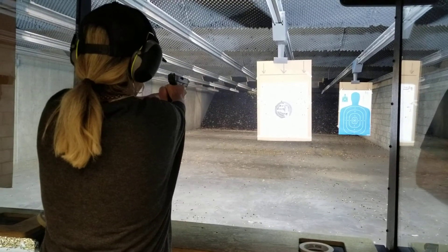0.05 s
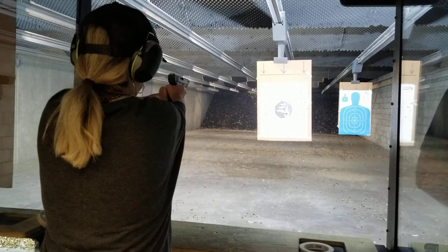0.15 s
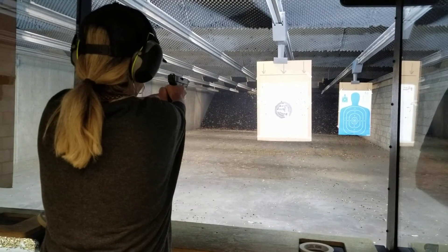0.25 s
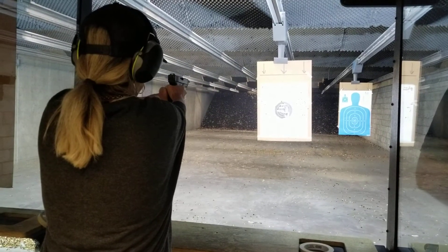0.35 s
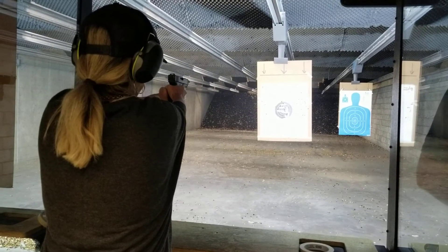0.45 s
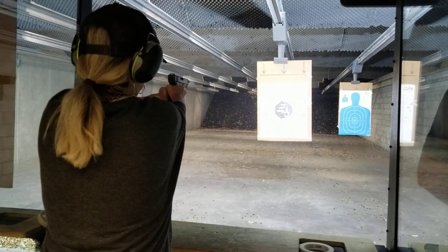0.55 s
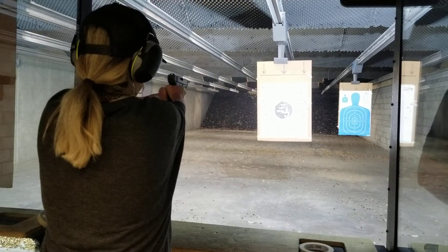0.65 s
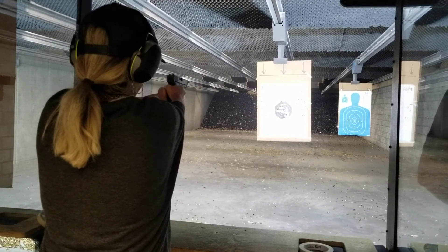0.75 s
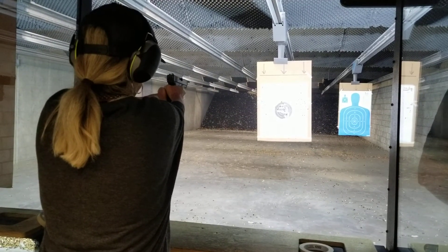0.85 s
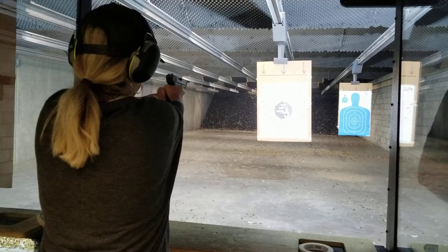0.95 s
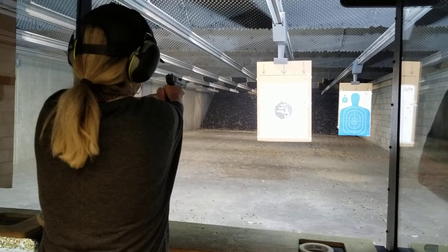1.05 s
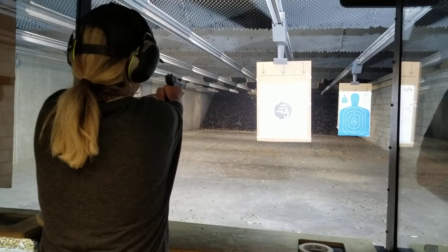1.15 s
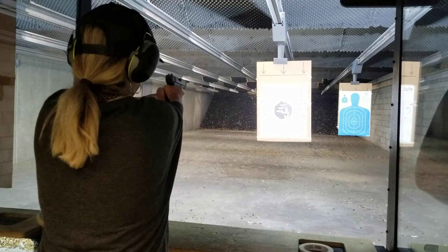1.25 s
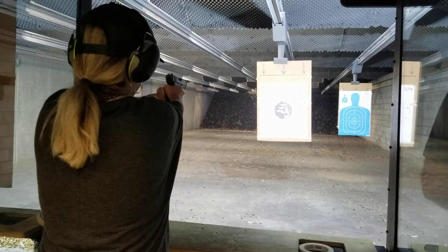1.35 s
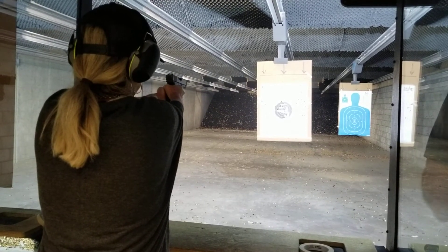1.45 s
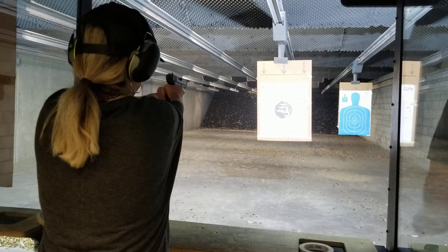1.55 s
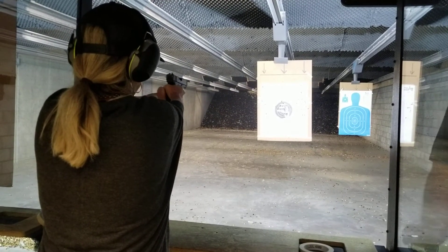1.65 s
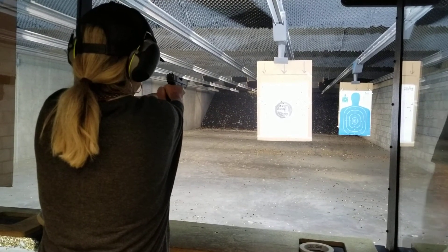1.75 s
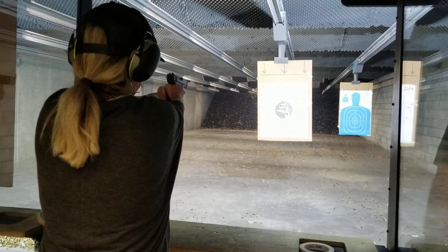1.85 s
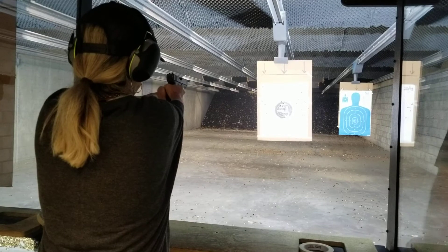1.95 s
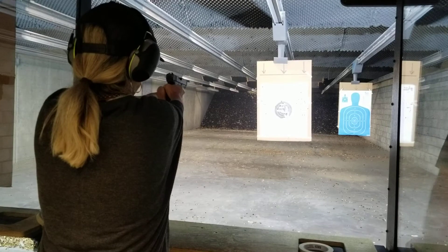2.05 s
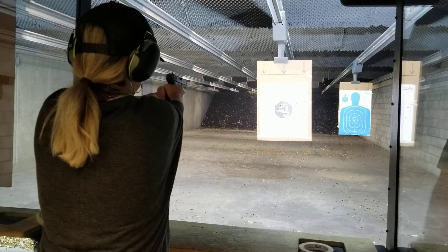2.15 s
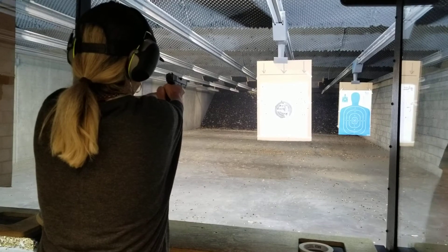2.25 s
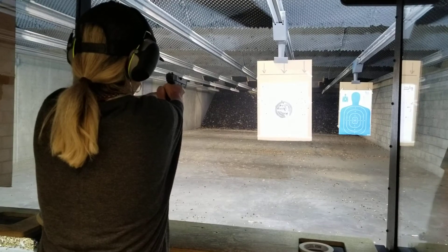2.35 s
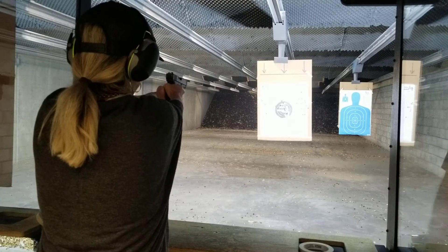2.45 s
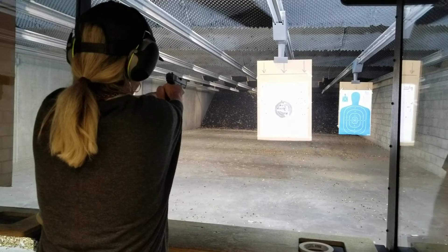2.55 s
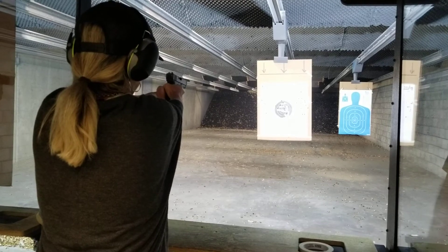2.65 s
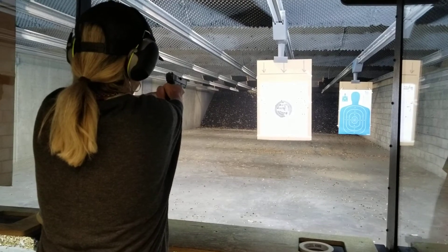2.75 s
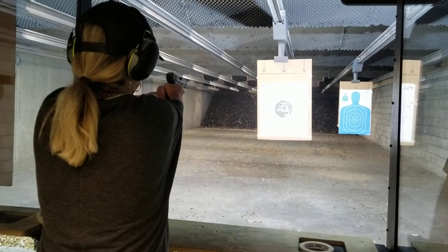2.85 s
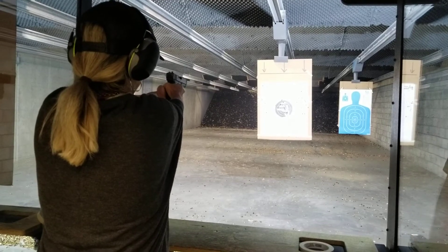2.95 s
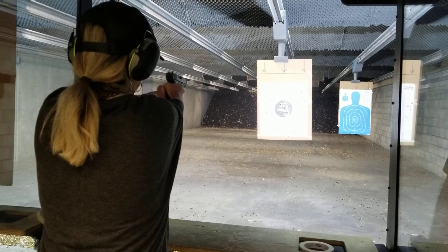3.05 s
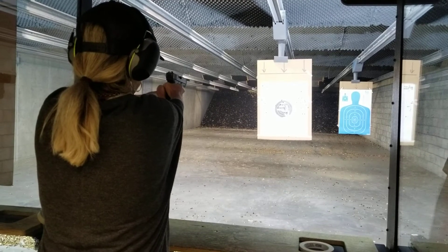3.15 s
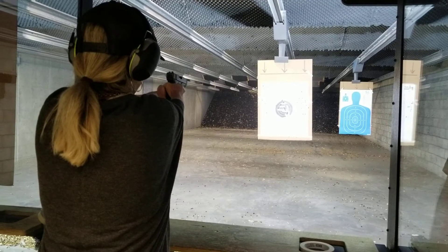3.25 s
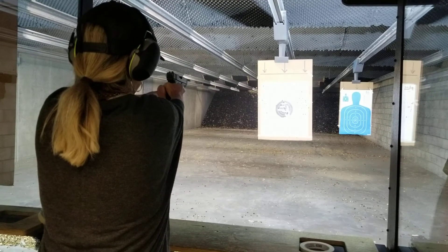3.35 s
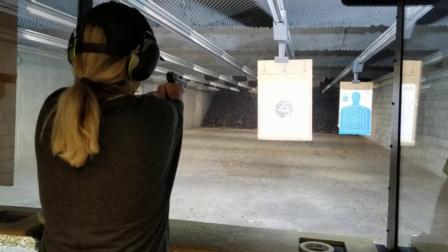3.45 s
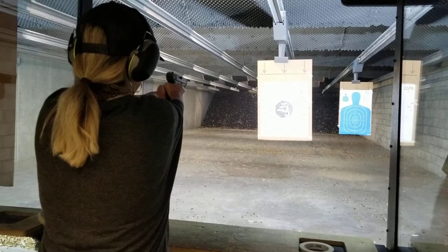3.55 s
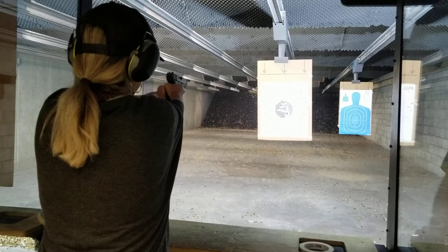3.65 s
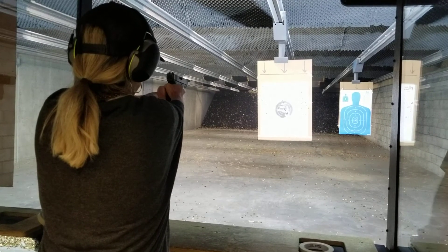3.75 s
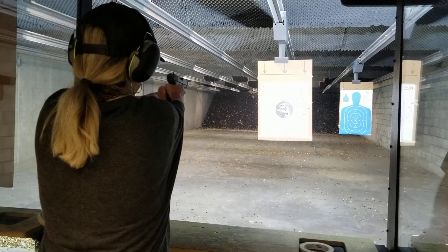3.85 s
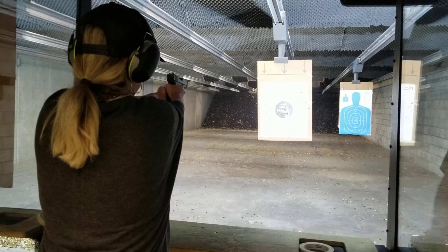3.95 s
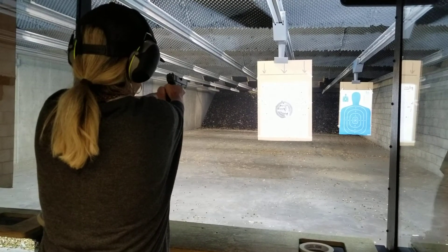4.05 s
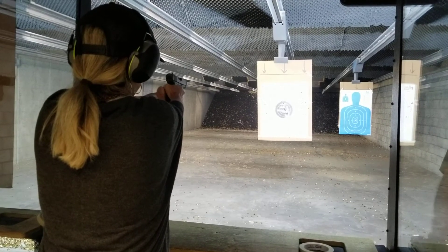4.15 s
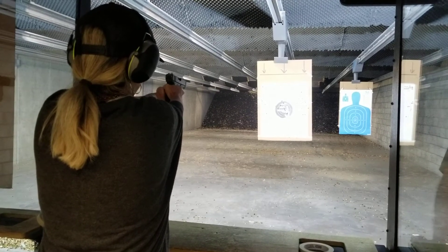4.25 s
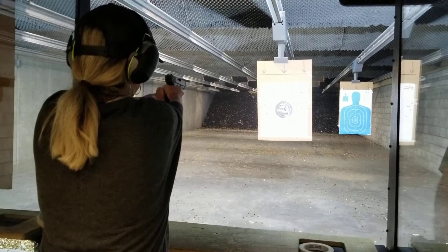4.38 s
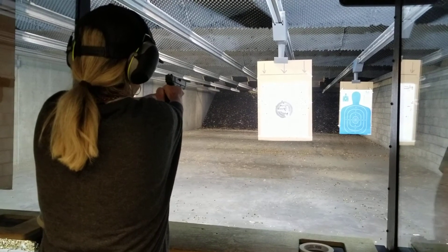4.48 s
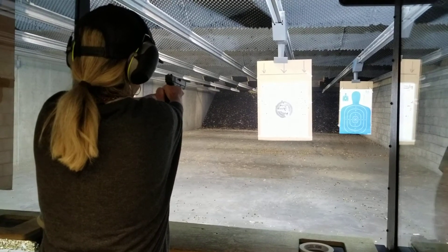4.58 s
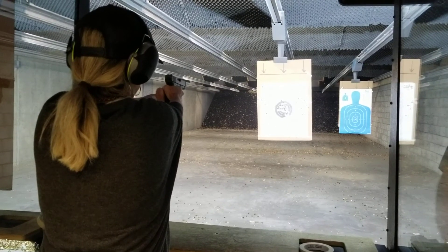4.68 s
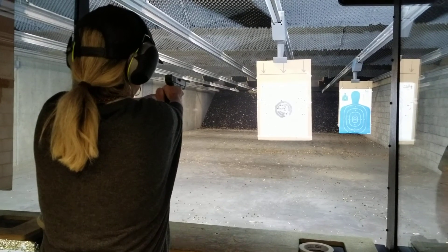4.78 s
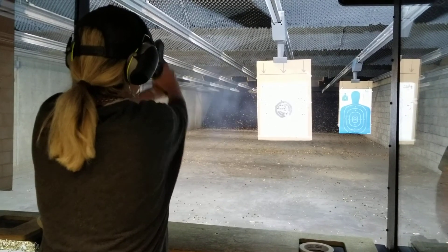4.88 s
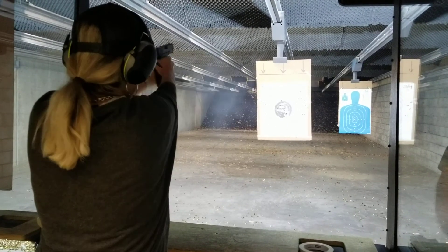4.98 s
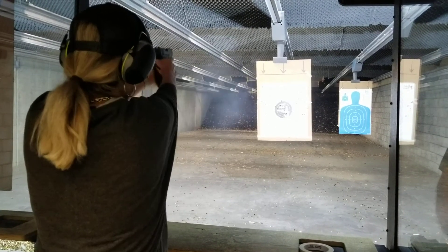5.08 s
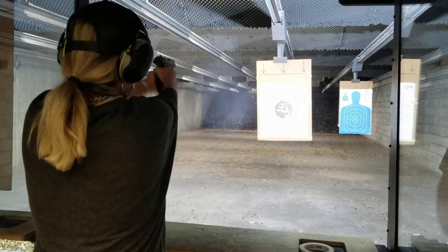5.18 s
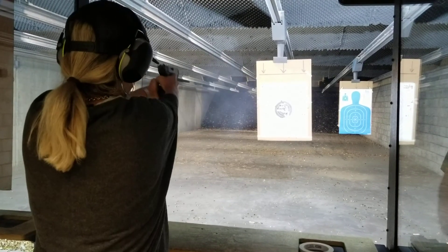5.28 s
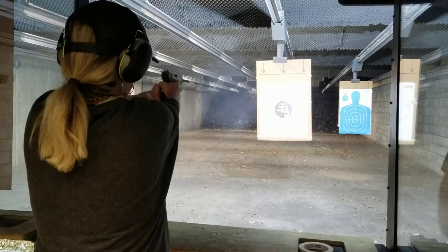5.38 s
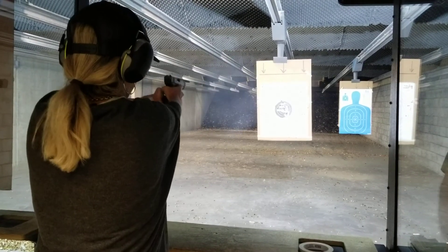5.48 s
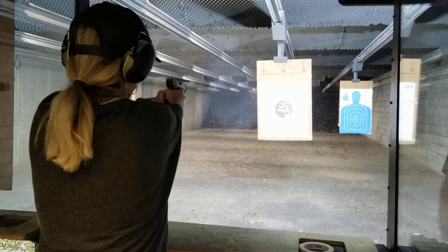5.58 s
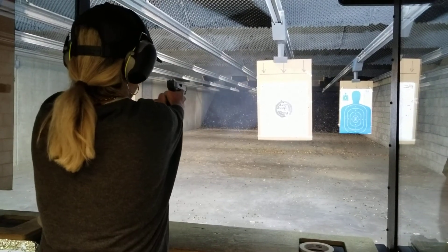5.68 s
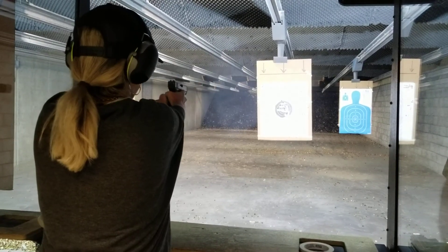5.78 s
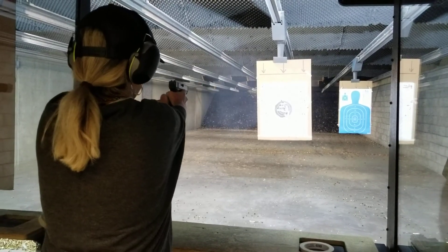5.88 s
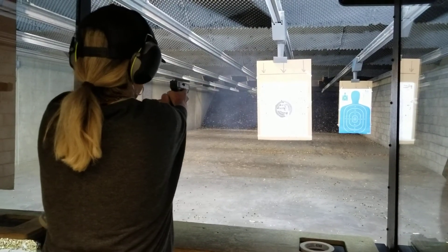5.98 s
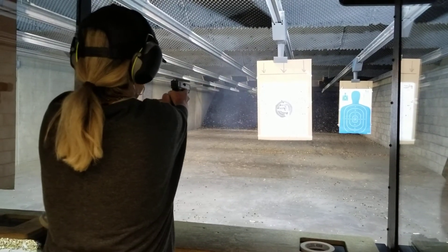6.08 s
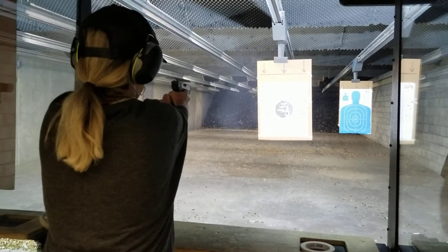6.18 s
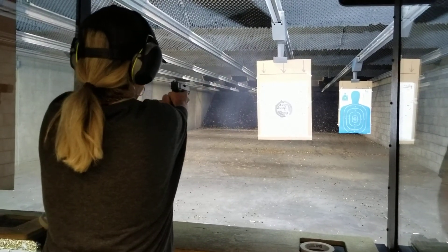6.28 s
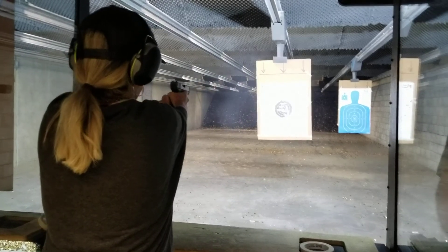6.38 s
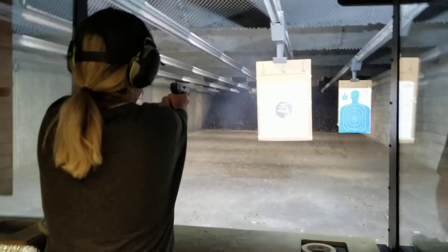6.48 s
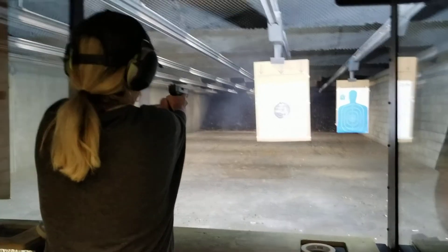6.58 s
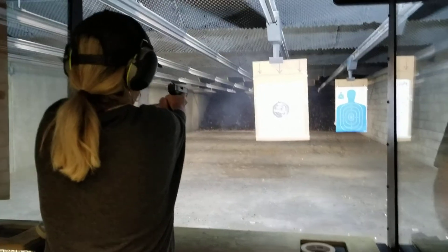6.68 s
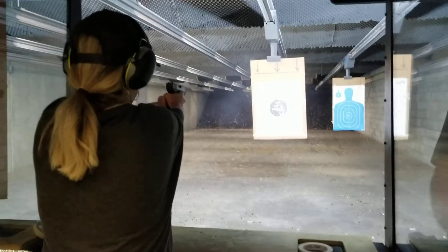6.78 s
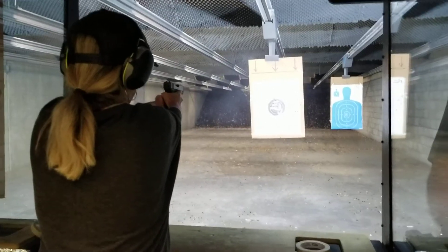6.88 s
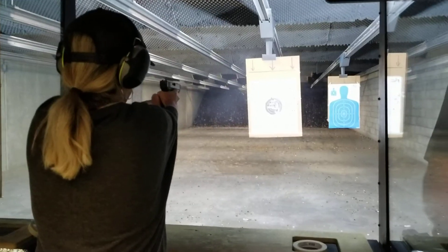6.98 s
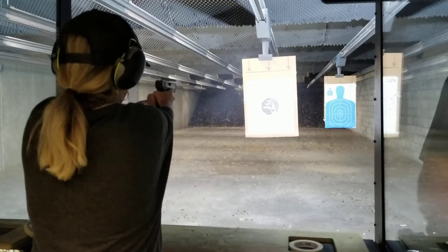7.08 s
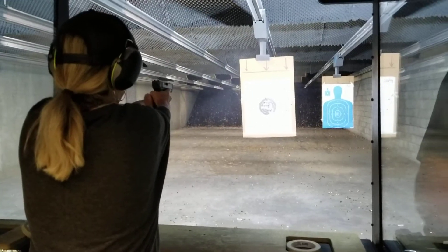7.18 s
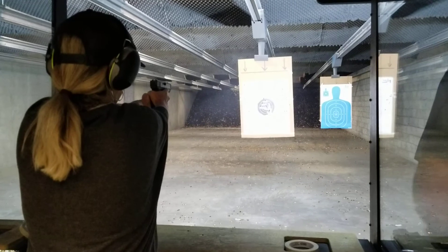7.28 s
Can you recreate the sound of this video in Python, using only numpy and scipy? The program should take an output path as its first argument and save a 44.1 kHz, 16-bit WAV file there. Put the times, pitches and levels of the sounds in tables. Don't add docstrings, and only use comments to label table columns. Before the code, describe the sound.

In a concrete indoor shooting range, a low wavering fan hum and air rumble run under cloth rustles, metallic clicks and bench knocks near the phone behind the shooter. Just before five seconds, one pistol shot cracks and roars through the hall. The phone's gain collapses, so the background nearly vanishes and slowly creeps back while the ejected case ticks and rings on the floor, followed by faint low knocks.

```python
import sys
import numpy as np
from scipy import signal
from scipy.fft import rfft, irfft, next_fast_len
from scipy.io import wavfile
from scipy.ndimage import uniform_filter1d

SR = 44100
rng = np.random.default_rng(int(sys.argv[2]) if len(sys.argv) > 2 else 0)


def nominal_scale(level):
    x = np.asarray(level, float) / 20
    return 10 ** x


def unload_audio(sound):
    columns = np.transpose(np.atleast_2d(sound))
    steps = np.round(np.clip(columns, -1, 1) * 32767)
    wavfile.write(sys.argv[1], SR, steps.astype(np.int16))


N = 323253
t = np.arange(N) / SR

SHOT_S, SHOT_DB = 4.7937, -10.3
# [f/Hz, level/dB per Hz]
BLAST_COLOUR = [(24, -40), (40, -19.5), (104, -15), (310, -9), (420, -5), (491, -14.5), (715, -4),
                (896, -10), (965, -5.5), (1070, -8), (1270, -7), (3060, -16.5), (6170, -18.5), (8550, -29),
                (12100, -17.5), (16000, -21)]
# [f/Hz, level/dB, t60/s]
FLOOR_MODES = [(62, -33, .9), (95.5, -35.5, 1.6), (243, -33.5, .6)]
# [delay t/s, size (negative = inverted)]
WALL_ECHOES = [
    (0, 1.4),
    (.0066, .6),
    (0.0109, -1.1),
    (0.0181, -.7),
    (.032, .6),
    (0.0628, .7),
]


def shot():
    start = int(SHOT_S * SR) + 8

    def blast_gain(hz):
        return nominal_scale(read(BLAST_COLOUR, hz) - read(MIC_COLOUR, np.minimum(hz, 15000)))

    roar = level(colour(stereo_noise(N - start), blast_gain), SHOT_DB)
    roar = np.pad(hall(roar, 0.92, 2.32), ((0, 0), (start, 0)))
    push = 0
    for delay, size in WALL_ECHOES:
        u = (t - SHOT_S - delay) / .00035
        push = push + size * (u > 0) * (1 - .6 * u) * np.exp(-.7 * np.abs(u))
    after = np.maximum(t - SHOT_S, 0)
    boom = 0
    for hz, db, t60 in FLOOR_MODES:
        boom = boom + nominal_scale(db - 60 * after / t60) * np.sin(2 * np.pi * hz * after)
    return (roar * ears(1.8) + nominal_scale(-5.5) * push + boom) * heard(SHOT_S)


# [f/Hz, t60/s]
HALL_DECAY = [(60, 1), (250, 0.47), (1000, 0.53), (3000, 0.54), (6000, 0.53), (9000, 0.39), (14000, 0.27)]
# [f/Hz, steady time t/s, long tail level/dB]
LINGER = [(100, .03, -24), (300, 0.075, -24.5), (800, 0.046, -23), (1997, .03, -21), (5000, 0.014, -29),
          (12000, 0.012, -44)]


def hall(noise, stretch, late_stretch):
    out = 0
    after = t[:noise.shape[1]]
    for centre, band in half_octaves(noise, 32 * 2 ** np.arange(0, 9.6, .5)):
        hold = read(np.array(LINGER)[:, [0, 1]], centre)
        late_db = read(np.array(LINGER)[:, [0, 2]], centre)
        fall_db = -60 * np.maximum(after - hold, 0) / (stretch * read(HALL_DECAY, centre))
        out = out + band * (nominal_scale(fall_db) + nominal_scale(late_db + fall_db / late_stretch))
    return out


# [t/s, click level/dB, left minus right/dB, ring level/dB, hall level/dB]
CASE_BOUNCES = [
    (5.7496, -47.5, -1.0, -12, -25),
    (5.7577, -49.5, -1.5, -20, -11),
    (6.3467, -41.5, 16, -19, -18),
    (6.5914, -43, 9, -15, -14),
    (6.7281, -51, 1.5, -19, -11.5),
    (6.4786, -57, 10.0, -34, -36),
    (6.5207, -52, 17, -37, -37),
]
# [f/Hz, level/dB, t60/s]
CASE_MODES = [(4300, 4, 0.016), (4260, -12, 0.24), (6907, -4, 0.33), (7930, -11.5, .1), (11670, -8.5, .1)]
# [t/s, f/Hz, level/dB, t60/s]
CASE_TINKLES = [
    (6.69, 4950, -63, .3),
    (6.667, 5400, -62, .25),
    (6.667, 6170, -70, .25),
    (6.68, 4300, -70, .3),
    (6.68, 5800, -68, .2),
    (6.69, 2900, -68, .15),
    (6.69, 3400, -70, .15),
]


def spent_case():
    ticks, rings = np.zeros((2, N)), np.zeros((2, N))
    for start, db, pan_db, ring_db, _ in CASE_BOUNCES:
        i = int(start * SR)
        ticks[:, i:i + 3] += 2.6 * nominal_scale(db) * heard(start) * ears(pan_db) * np.array([1, .45, -.8])
        for hz, mode_db, t60 in CASE_MODES:
            ring(rings, start, hz, db + ring_db + mode_db, t60, .002)
    for start, hz, db, t60 in CASE_TINKLES:
        ring(rings, start, hz, db, t60, .003)
    band = signal.butter(2, [1800, 13000], "band", fs=SR, output="sos")
    return rings + signal.sosfilt(band, ticks)


# [t/s, level/dB]
TRAY = [(1610, 0, .16), (2650, -7, .1), (2100, -11, .1), (1150, -11, .1)], [(.003, -32), (.058, -34.5),
        (.115, -36)]
LATCH = [(1210, -6, .17), (1780, -13, .25), (2800, -8, .06), (3300, -8, .1), (4630, -3, .2), (6900, -9, .1),
         (9200, -4, .1), (11350, 2, .22)], [(1.156, -29), (1.171, -31)]
BUCKLE = [(2200, 0, .45)], [(.84, -52), (1.8, -48)]
CLIP = [(1950, 0, .15), (2290, -7, .12), (5540, -9, .1)], [(2.392, -30), (2.445, -38)]
BENCH = [(390, 0, .3), (800, 2.5, .05)], [(2.44, -34), (2.503, -35), (2.748, -24.5)]
SHELF = [(790, 0, .07), (1250, -8, .12), (1840, -13, .16)], [(6.954, -48), (7.001, -48)]


def gear():
    out = np.zeros((2, N))
    for modes, strikes in (TRAY, LATCH, BUCKLE, CLIP, BENCH, SHELF):
        for start, strike_db in strikes:
            for hz, db, t60 in modes:
                ring(out, start, hz, db + strike_db, t60, .022)
    return out


# [t/s, mid level/dB, low level/dB, treble level/dB, length/s]
KNOCKS = [(0.0044, -42.5, -31.5, -53.5, 0.0024), (0.0475, -43, -34, -66, 0.007),
          (0.109, -50, -41, -70, 0.007), (1.148, -36, -52, -46, 0.008), (1.153, -26, -45, -22.5, 0.022),
          (2.3904, -34.5, -28.5, -39.5, 0.021), (2.4326, -37.5, -34, -35, 0.007),
          (2.497, -37.5, -32, -45, 0.02), (2.739, -30, -20, -51, 0.0088),
          (2.7455, -22.5, -13.5, -41, 0.009), (4.058, -45, -41, -68.5, 0.016),
          (6.662, -55.5, -63.5, -59, 0.0092), (6.9525, -63, -44, -78, 0.007),
          (7.0, -59.5, -42.5, -80, 0.0063)]
# [t/s, mid level/dB, treble level/dB, left minus right/dB]
CREASES = [(0.258, -49.5, -62, 5), (0.332, -45, -52.5, -6.5), (0.601, -45, -56, 0), (0.832, -47, -56, 1.5),
           (1.0984, -52, -66, -2.5), (1.6794, -54, -55, 0), (1.7868, -45.5, -51, 1.5),
           (1.8594, -51.5, -58, -3), (2.668, -48, -56, 0.5), (2.8194, -44.5, -53, -1.5),
           (3.024, -48.5, -53, -1.5), (3.0859, -52, -57, 0), (4.263, -42, -64, -3.5),
           (4.4513, -53, -72.5, 1), (5.424, -68, -85, -4), (5.454, -60, -83, -4), (5.5084, -61.5, -83, -2),
           (6.1194, -69, -68, 3), (7.1894, -75.5, -73, -0.5)]
# [t/s, mid level/dB, treble level/dB, left minus right/dB]
BRUSHES = [(0.1126, -50, -50, 7), (0.3444, -46, -56, 1), (0.4664, -46, -50.5, -8.5), (0.494, -40.5, -38, 2),
           (0.6194, -46, -56, 0.5), (0.955, -49, -48, -2.5), (1.28, -44, -50, 0.5), (1.549, -48.5, -70, -1),
           (1.8068, -43.5, -66, 0), (1.964, -49.5, -52, -1.5), (2.4314, -36, -37.5, -1),
           (3.54, -42, -48, 0), (3.8094, -53, -62, 2), (3.849, -54, -56, -1.5), (4.0105, -48, -60, -1),
           (4.4794, -50.5, -57, 1), (6.125, -58.5, -58, 0.5)]
# [t/s, mid level/dB, treble level/dB, left minus right/dB]
SHIFTS = [
    (0.3594, -50, -59.5, 1),
    (0.8594, -46.5, -50, 2.5),
    (2.1994, -50, -55, -3),
    (3.3694, -59, -54, 5),
    (3.47, -48, -46, 3),
    (3.9494, -47, -63, 1.5),
]
LEVEL_BANDS = (750, 2600, 6500, 10000, 15000)


def small_sounds():
    rows = []  # t/s, mid, low and treble level/dB, left minus right/dB, length/s
    for cloth, span in ((CREASES, .006), (BRUSHES, .043), (SHIFTS, .13)):
        rows += [(start, mid, mid - 11, top, pan, span) for start, mid, top, pan in cloth]
    rows += [(start, mid, low, top, .6, span) for start, mid, low, top, span in KNOCKS]
    for start, db, _, _, hall_db in CASE_BOUNCES:
        wet = db + hall_db
        rows.append((start, wet, wet - 19, wet + 4.5, 0, .002))
    out = 0
    for centre, band in half_octaves(stereo_noise(N), 250 * 2 ** np.arange(0, 6.6, .5)):
        power = np.zeros((2, N // 8 + 1))
        bass_cut_db = 14.5 * max(np.log2(LEVEL_BANDS[0] / centre), 0)
        for start, mid_db, low_db, top_db, pan_db, span in rows:
            upper_db = mid_db + 1 - .6 * max(low_db - mid_db, 0)
            levels = (low_db, mid_db, upper_db, top_db + 6.5, top_db - 1)
            db = read(list(zip(LEVEL_BANDS, levels)), centre) - bass_cut_db
            shape = np.hanning(int(span * SR / 8) + 3)[1:-1]
            i = int(start * SR / 8)
            power[:, i:i + len(shape)] += (nominal_scale(db) * heard(start) * ears(pan_db)) ** 2 * shape / shape.sum()
        t60 = .33 * read(HALL_DECAY, centre)
        early = fade(power, t60)
        late = fade(power, 2.2 * t60)
        size = np.sqrt(early + nominal_scale(2 * -7.5) * late)
        out = out + level(band, -9) * np.repeat(size, 8, axis=1)[:, :N]
    return out


def fade(power, t60):
    return signal.lfilter([1], [1, -nominal_scale(-960 / SR / t60)], power)


# [f/Hz, level/dB per Hz]
AIR_COLOUR = [(20, -43.5), (35, -17), (47, -7), (64, -5.5), (130, -13), (190, -15), (260, -16.5),
              (340, -26.5), (489, -31), (760, -33), (1000, -39), (2500, -47.5), (7000, -55), (16000, -66)]
# [f/Hz, width/Hz, level/dB]
DUCT_MODES = [(61.55, 12, 2.5), (86, 10, -2), (162, 12, 10), (225, 43, 8)]
# [t/s, depth/dB]
FAN_FALTERS = [(.21, 14), (.34, 5), (.48, 7), (.66, 11), (.81, 14), (.9, 12), (1.01, 13), (1.28, 6),
               (1.49, 10), (1.72, 6), (2.1, 5), (2.32, 14), (2.5, 5), (2.95, 8), (3.37, 10), (3.72, 10),
               (3.8, 7), (3.91, 15), (4.05, 11), (4.28, 10), (4.38, 11), (4.57, 8), (4.74, 11), (5.87, 14),
               (6.045, 16), (6.24, 9), (6.48, 5), (7.1, 5), (7.23, 6)]


def ventilation():
    def duct_gain(hz):
        db = read(AIR_COLOUR, hz)
        for f, width, boost_db in DUCT_MODES:
            db = db + boost_db / (1 + (2 * (hz - f) / width) ** 2)
        return nominal_scale(db)

    air = level(colour(stereo_noise(N), duct_gain), -35)
    coarse = t[::64]
    dips = sum(db * np.exp(-((coarse - start) / .03) ** 2) for start, db in FAN_FALTERS)
    fan_db = -29 - np.interp(t, coarse, dips) + 1.5 * walk(25)
    fan_hz = 63.2 + 1.8 * walk(7.3)
    fan = nominal_scale(fan_db) * np.sin(2 * np.pi * np.cumsum(fan_hz) / SR)
    lull_db = 8 * np.exp(-((t - 4.45) / .3) ** 2)
    whine = nominal_scale(-69 - lull_db + 1.5 * walk(20)) * np.sin(2 * np.pi * 15655 * t)
    return (air + fan) * ears(.9) + whine * ears(2.5)


# [f/Hz, share 0-1]
LIKENESS = [(60, 0.98), (250, 0.95), (600, .45), (1500, 0), (8000, .05)]


def stereo_noise(size):
    mid, side = rng.standard_normal((2, size))
    mid = colour(mid, lambda hz: np.sqrt(1 + np.clip(read(LIKENESS, hz), 0, 1)))
    side = colour(side, lambda hz: np.sqrt(1 - np.clip(read(LIKENESS, hz), 0, 1)))
    return np.array([mid + side, mid - side]) / np.sqrt(2)


def ring(out, start, hz, db, t60, spread):
    i = int(start * SR)
    s = t[:min(int(1.2 * t60 * SR), N - i)]
    partials = hz * (1 + spread * rng.standard_normal((6, 1, 1)))
    phases = rng.random((6, 2, 1))
    onset = np.minimum(s * hz, 1)
    size = nominal_scale(db - 60 * s / t60) * onset / np.sqrt(6) * heard(start)
    out[:, i:i + len(s)] += size * np.sin(2 * np.pi * (partials * s + phases)).sum(axis=0)


def half_octaves(noise, centres):
    size = next_fast_len(noise.shape[1], True)
    lines = rfft(noise, size)
    octave = np.log2(np.maximum(np.fft.rfftfreq(size, 1 / SR), 1))
    for centre in centres:
        gain = np.cos(np.pi * np.clip(octave - np.log2(centre), -.5, .5)) ** 2
        yield centre, irfft(lines * gain, size)[:, :noise.shape[1]]


def walk(rate):
    k = int(SR / rate)
    steps = np.repeat(rng.standard_normal(N // 400), k)[:N]
    return level(uniform_filter1d(uniform_filter1d(steps, k), k), 0)


def read(table, hz):
    table = np.array(table)
    return np.interp(np.log(np.maximum(hz, 1)), np.log(table[:, 0]), table[:, 1])


def colour(x, gain):
    size = next_fast_len(x.shape[-1] + SR // 10, True)
    return irfft(rfft(x, size) * gain(np.fft.rfftfreq(size, 1 / SR)), size)[..., :x.shape[-1]]


def level(x, db):
    return x * nominal_scale(db) / np.sqrt(np.mean(x ** 2))


def ears(pan_db):
    return nominal_scale(np.array([[pan_db], [-pan_db]]) / 2)


def gain_db(s):
    dive_at_s, dive_s, hold_s = 4.786, .004, .4
    rest = 2.6 - .58 * s
    ducked = -41.5 + 9.1 * np.maximum(s - dive_at_s - hold_s, 0)
    share = np.clip((s - dive_at_s) / dive_s, 0, 1)
    return (1 - share) * rest + share * ducked


def heard(start):
    return nominal_scale(-gain_db(start + .005))


def scene():
    return shot() + spent_case() + gear() + small_sounds() + ventilation()


# [f/Hz, level/dB]
MIC_COLOUR = [(100, 0), (6800, -1.5), (7600, 0.5), (8300, -9.5), (10500, -9), (12000, -2.5), (15700, 2.5),
              (15800, -3.5), (16000, -28)]


def microphone(x):
    return colour(x, lambda hz: nominal_scale(read(MIC_COLOUR, hz)))


def top_cut(x):
    return signal.sosfilt(signal.butter(12, 17000, fs=SR, output="sos"), x)


def record(dry):
    clipped = np.tanh(1.205 * dry * nominal_scale(gain_db(t))) / 1.025
    mix = microphone(clipped)
    return top_cut(mix)


dry = scene()
out = record(dry)
unload_audio(out)
```